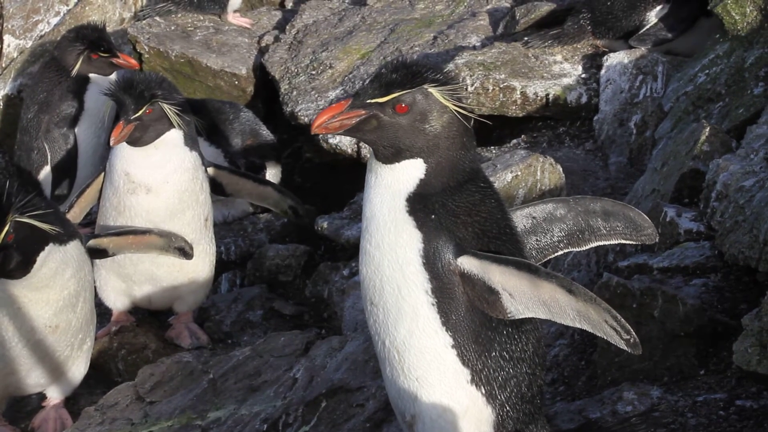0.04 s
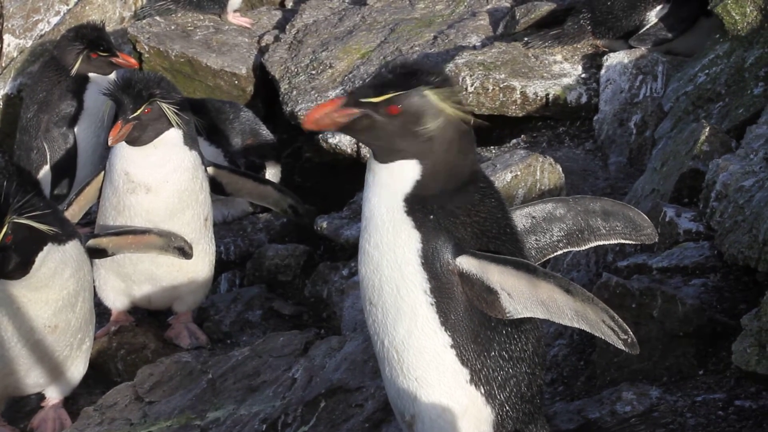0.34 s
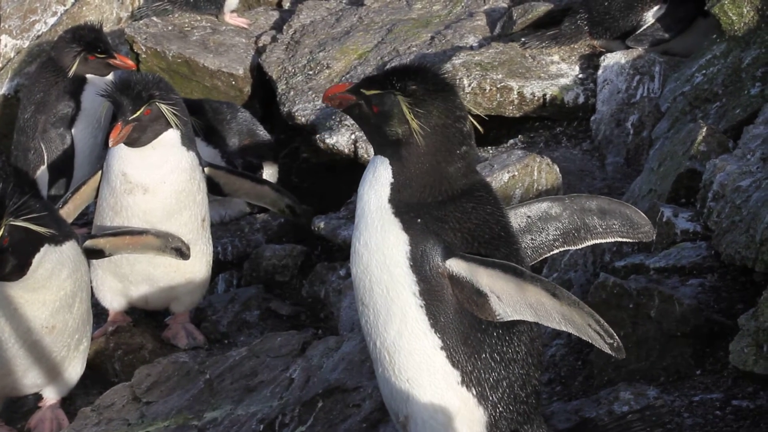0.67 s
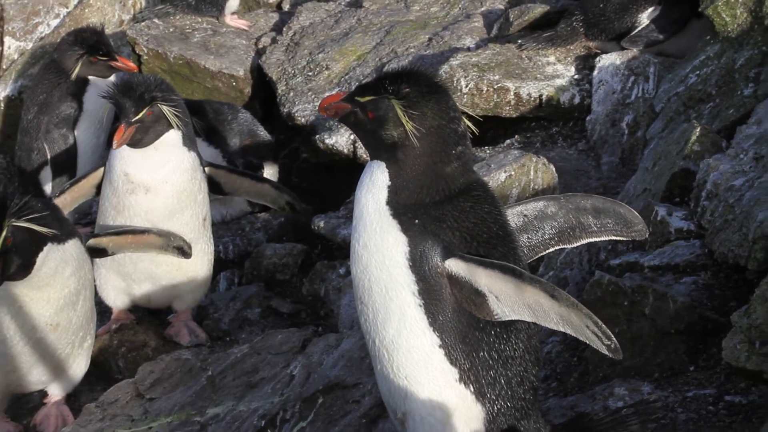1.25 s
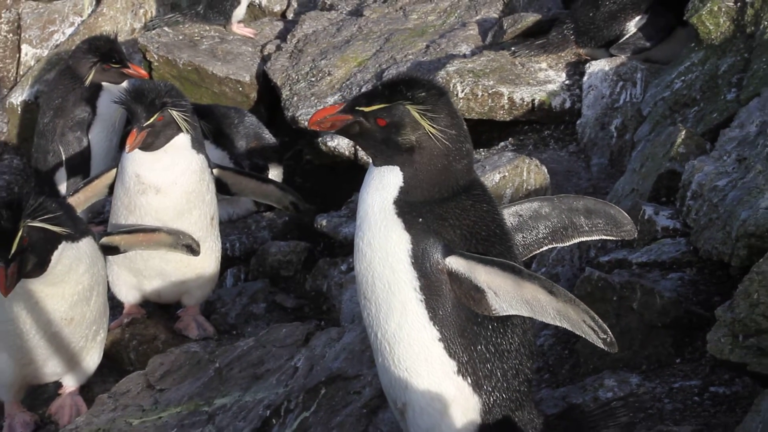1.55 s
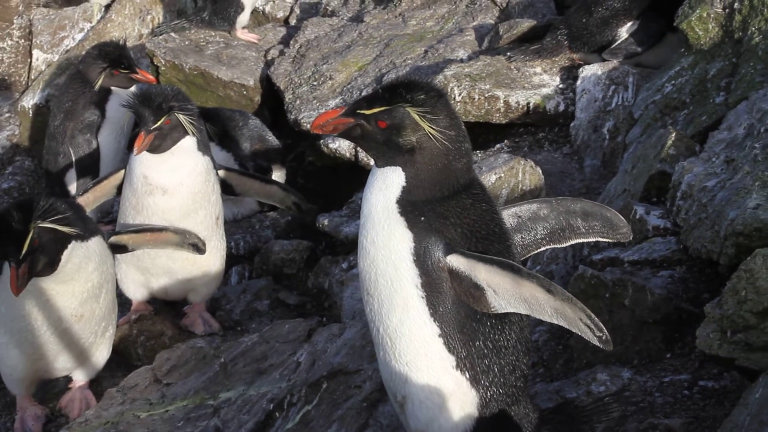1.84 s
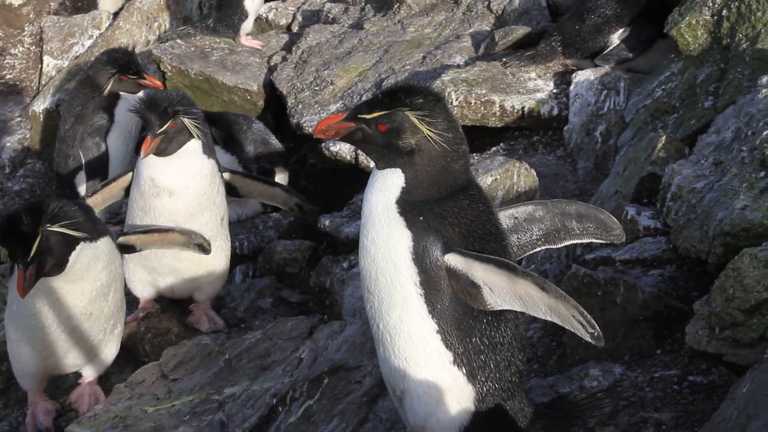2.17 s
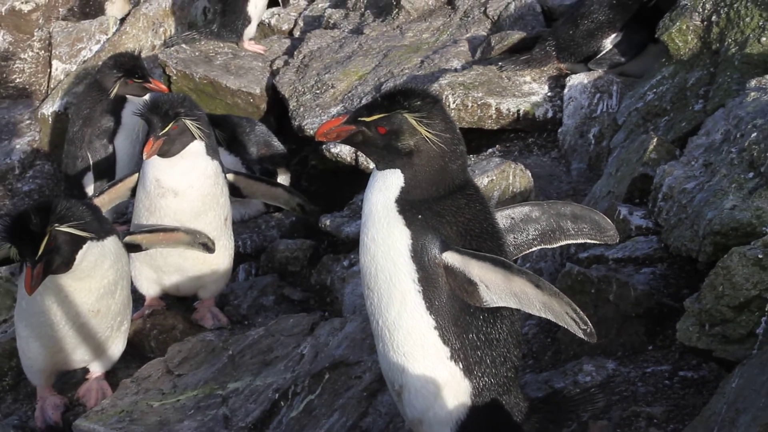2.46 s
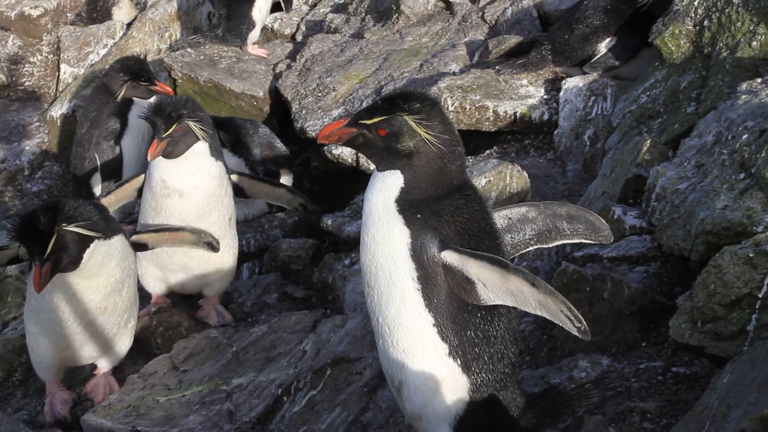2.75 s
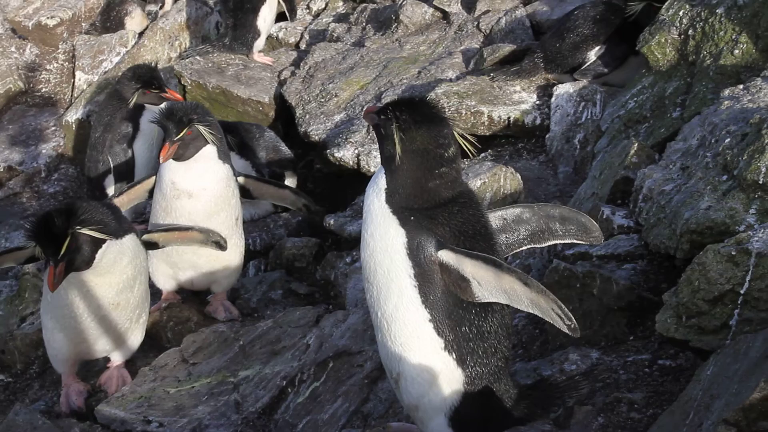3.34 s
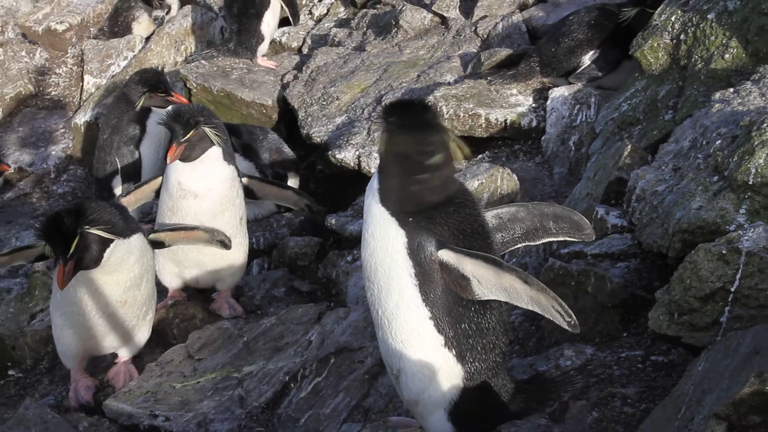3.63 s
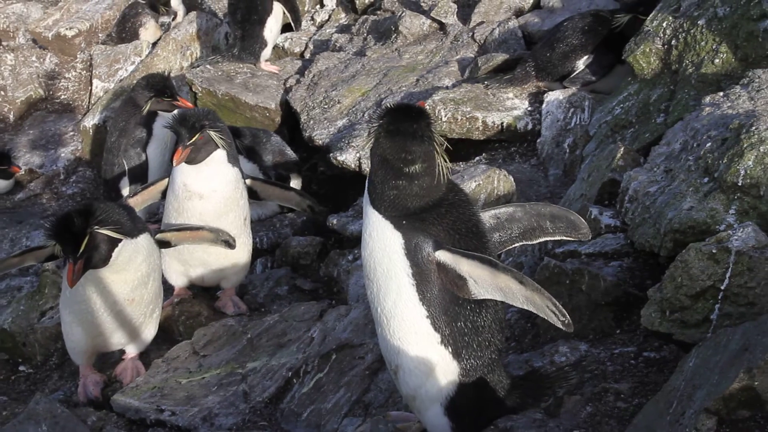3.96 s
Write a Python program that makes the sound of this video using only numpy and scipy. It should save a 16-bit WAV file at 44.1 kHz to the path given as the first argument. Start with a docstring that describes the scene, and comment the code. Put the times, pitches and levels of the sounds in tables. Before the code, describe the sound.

A penguin gives one short, mewing call over faint surf and wind.

```python
"""A penguin gives one arched, mewing call among shore rocks, close by. Its voice starts as a low creak, flips
up into a clear whistle, sinks and breaks back into the creak. Air fluttering in the throat and bill adds a
rasp, a faint breathy puff follows the call, and the rocks send back short echoes. Behind it lie faint surf and
wind, a low wavering hum, soft booms and a few scuffs on the stone."""
import sys
import numpy as np
from scipy import signal
from scipy.fft import rfft, irfft
from scipy.io import wavfile

SR = 44100
rng = np.random.default_rng(int(sys.argv[2]) if len(sys.argv) > 2 else 0)


def waveform_to_disk(signal):
    """Save audio, clipped to [-1, 1], as 16-bit WAV at the path in sys.argv[1]."""
    frames = np.transpose(np.atleast_2d(signal))
    scaled = np.clip(frames, -1, 1) * 32767
    samples = np.round(scaled).astype(np.int16)
    wavfile.write(sys.argv[1], SR, samples)


N = 176400
T = np.arange(N) / SR

# Tone color of the surf: frequency_hz, gain_db
SURF_COLOR = [(53, -37), (90, -6), (119, -2), (133, -12.5), (151, -7), (204, -14), (248, -13.5),
              (342, -10.5), (373, -14.5), (398, -13), (864, -13.5), (2710, -27), (3510, -24), (4540, -34),
              (15500, -40)]
# Loudness of the surf, in three stretches of rows: time_s, relative_db
SURF_LOUDNESS = [
    [(0.05, -70.5), (0.946, -75.5), (1.432, -71), (1.48, -71.5)],
    [(2.4, -69.5), (2.416, -70.5), (2.94, -72), (2.95, -72)],
    [(3.2, -71), (3.788, -72.5), (3.792, -70), (3.95, -71.5)],
]
# Loudness of the wind: time_s, level_db
WIND_LOUDNESS = [(0, -62), (.4, -62.5), (.55, -61), (.8, -63), (.88, -61.5), (1.02, -62.5), (1.5, -62.5),
                 (2.6, -62.5), (4, -63)]
# Low wavering tones: pitch_hz, level_db, waver_amount, waver_rate_hz
HUM_TONES = [(60.9, -64, 0.38, 2), (119.6, -73, 1.08, 7)]
# Soft low booms: middle_s, length_s, level_db, pitch_hz
BOOMS = [(.89, 0.054, -68.5, 205), (1.422, 0.054, -62, 205), (2.048, 0.051, -61, 206),
         (2.215, 0.075, -66, 226), (3.016, .07, -71.5, 225)]
# Rubs on the stone, plus one faint breathy puff from the bird just after the call (the 2.28 s row): middle_s,
# length_s, level_db, center_hz, width_octaves
RUBS_AND_PUFF = [(.3, 0.28, -77, 2570, .7), (1.637, .005, -59.5, 1200, 0.98), (1.712, 0.0047, -64, 710, 0.59),
                 (2.28, 0.06, -62, 2150, 0.39), (2.995, 0.0051, -58, 1580, 0.49),
                 (3.011, 0.02, -60.5, 1360, 0.66), (3.86, 0.082, -71.5, 1590, 0.56)]
# Tiny ticks of grit: start_s, level_db
GRIT_TICKS = [(.527, -65), (.87, -65), (3.147, -58.5), (3.285, -62)]
# Echoes off the rocks: delay_s, gain_db
ROCK_ECHOES = [(.0043, -26), (.011, -15), (.023, -36)]
# Where the throat and the bill ring: center_hz, width_hz, gain_db
THROAT_RINGS = [(1026, 104, -7), (1465, 82, -5), (1780, 70, 6.5), (2413, 220, -3), (3150, 120, -9.5),
                (3804, 220, -7), (4100, 170, -14.5)]
BILL_RINGS = [(4650, 260, -0.5), (6560, 290, 4.5), (7850, 540, -8), (10300, 1500, -16.5),
              (14000, 2000, -25)]
# Narrow bands that the bill cancels: center_hz, width_hz
BILL_NOTCHES = [(1290, 74), (2850, 67), (5050, 170)]
# Loudness of the rasp: time_s, throat_db, bill_db
RASP_LOUDNESS = [(1.53, -81, -95), (1.555, -53.5, -76), (1.62, -58, -83), (1.69, -56, -74.5),
                 (1.85, -56, -66), (1.98, -54.5, -68), (2.07, -55, -77), (2.12, -56.5, -72.5),
                 (2.144, -47, -59.5), (2.18, -50.5, -71), (2.203, -63, -81), (2.22, -85, -99)]
# The creaky voice that opens and closes the call: time_s, pitch_hz, level_db
OPENING_CREAK = [(1.529, 927.6, -70), (1.538, 968, -57), (1.549, 1009, -56), (1.559, 1072, -49),
                 (1.572, 1190, -61), (1.589, 1205, -58), (1.6, 1280, -52), (1.608, 1350, -61)]
CLOSING_CREAK = [(2.165, 1280, -63), (2.174, 1124, -46.5), (2.183, 919, -42.5), (2.192, 842, -50),
                 (2.205, 762, -57), (2.216, 700, -75)]
# Brief tones beside the whistle: middle_s, length_s, level_db, pitch_hz, glide_hz_per_s
SIDE_GLIDES = [(1.588, .016, -51, 2430, 5000), (2.12, 0.019, -50.5, 3750, -2500),
               (2.152, 0.014, -56, 2560, -3000), (2.141, 0.0089, -55.5, 6560, -9000)]
# Loudness of the undertone, which sits at half the whistle's pitch: time_s, level_db
UNDERTONE_LOUDNESS = [(1.665, -82), (1.685, -60), (1.75, -56.5), (1.8, -61), (1.9, -57), (1.965, -55),
                      (2.01, -66.5), (2.12, -71)]
# Tones that make up the undertone: multiple_of_half_pitch, gain_db
UNDERTONE_PARTS = [(1, -2.5), (3, -15.5), (5, -25.5), (7, -23)]
# Tones that make up the squeak: multiple_of_pitch, level_db
SQUEAK_PARTS = [(3, -63), (3.76, -62), (4.1, -65), (5, -69.5), (5.75, -80), (6.7, -84)]
# The whistle's arch and its harmonics (tones at 1, 2 and 3 times the pitch), before trims and notches:
# time_s, pitch_hz, first_db, second_db, third_db
WHISTLE_ARCH = [(1.606, 1687, -35, -78, -88), (1.618, 1708, -35, -51, -78), (1.634, 1737, -36, -58, -83),
                (1.642, 1795, -38, -64, -84), (1.67, 2051, -49.5, -49.5, -83),
                (1.684, 2099, -43.5, -41.5, -65.5), (1.738, 2178, -38.5, -46.5, -51),
                (1.752, 2210, -37, -45.5, -53.5), (1.86, 2186, -35.5, -42.5, -45.5),
                (1.868, 2165, -38.5, -45, -49.5), (1.912, 2175, -35.5, -43.5, -46),
                (1.962, 2109, -39.5, -41, -56), (1.972, 2098, -45, -48.5, -68),
                (2.012, 2045, -36, -43, -62.5), (2.02, 2037, -36, -46.5, -73),
                (2.072, 1953, -40.5, -55, -86), (2.122, 1713, -29.5, -52, -62),
                (2.142, 1645, -32.5, -41.5, -57.5), (2.168, 1542, -37.5, -52, -71)]
# Trims for harmonics 1 to 3: gain_db
HARMONIC_TRIMS = [-2, -2, -3.5]
# Harmonics 4 and 5, against the untrimmed third: gain_db
HIGH_HARMONICS = [-33, -36]
# Wobbles where the voice changes register: middle_s, half_length_s, swing_share_of_pitch
VOICE_BREAKS = [(1.664, 0.016, 0.061), (2.085, .012, 0.079)]


def from_db(db):
    """Turn decibels into a number to multiply by."""
    return 10 ** (np.asarray(db) / 20)


def unit_level(x):
    """Scale a sound to an average (rms) level of one."""
    return x / np.sqrt(np.mean(x ** 2) + 1e-20)


def curves(rows):
    """Join a table's points with straight lines: one curve for each column after the time."""
    times, *columns = np.transpose(rows)
    return [np.interp(T, times, column) for column in columns]


def gate(start_s, end_s, fade_s):
    """Fade in at the start, hold at one, and fade out by the end."""
    return np.clip((T - start_s) / fade_s, 0, 1) * np.clip((end_s - T) / fade_s, 0, 1)


def swell(middle_s, length_s):
    """A smooth, bell-shaped rise and fall."""
    return np.exp(-2 * ((T - middle_s) / length_s) ** 2)


def noise(gain_at):
    """Noise of level one, colored by a gain for each frequency."""
    hz = np.maximum(np.arange(N // 2 + 1) * SR / N, 1)
    return unit_level(irfft(rfft(rng.standard_normal(N)) * gain_at(hz), N))


def noise_band(center_hz, width_octaves):
    """Noise that is strongest around one frequency."""
    return noise(lambda hz: 1 / (1 + (np.log2(hz / center_hz) / width_octaves) ** 2))


def drift(rate_hz):
    """A random wander of typical size one, mostly slower than the rate."""
    return noise(lambda hz: 1 / (1 + (hz / rate_hz) ** 2))


def phase_of(hz):
    """Add up a changing pitch into the angle of a sine wave."""
    return 2 * np.pi * np.cumsum(hz) / SR


def surf(boost_db=3.5):
    """Distant waves: a deep wash of noise whose level wanders a little."""
    points_hz, gains_db = np.transpose(SURF_COLOR)
    level_db, = curves([row for stretch in SURF_LOUDNESS for row in stretch])
    wash = noise(lambda hz: from_db(np.interp(np.log(hz), np.log(points_hz), gains_db))
                 / (1 + (hz / 6000) ** 4))
    return from_db(level_db + boost_db + 0.5 * drift(5.4)) * wash


def wind():
    """Wind makes a very low rumble."""
    level_db, = curves(WIND_LOUDNESS)
    return from_db(level_db) * noise_band(center_hz=19, width_octaves=0.66)


def hum():
    """Two low tones waver in loudness and pitch."""
    sound = np.zeros(N)
    for hz, db, waver, rate_hz in HUM_TONES:
        phase = 2 * np.pi * hz * T
        tone = (1 + waver * drift(rate_hz)) * np.sin(phase)
        tone += waver * drift(rate_hz) * np.cos(phase)
        sound += from_db(db) * unit_level(tone)
    return sound


def hiss(level_db=-81.5):
    """A thin, even hiss."""
    return from_db(level_db) * rng.standard_normal(N)


def booms():
    """Brief hollow booms in the background, unsteady in pitch."""
    sound = np.zeros(N)
    for middle_s, length_s, db, hz in BOOMS:
        tone = np.sin(phase_of(hz * (1 + 0.072 * drift(30))))
        sound += from_db(db) * swell(middle_s, length_s) * unit_level(tone)
    return sound


def scuffs_and_puff(tick_decay_s=0.0013):
    """Soft grainy rubs on the stone, a faint breathy puff just after the call, and sharp ticks of grit."""
    rubs = np.zeros(N)
    for middle_s, length_s, db, center_hz, octaves in RUBS_AND_PUFF:
        grainy_level = from_db(db + 2.3 * drift(200))
        rubs += grainy_level * swell(middle_s, length_s) * noise_band(center_hz, octaves)
    tick_level = sum(from_db(db) * (T >= start_s) * np.exp(-np.abs(T - start_s) / tick_decay_s)
                     for start_s, db in GRIT_TICKS)
    return rubs + tick_level * noise(lambda hz: hz / (hz + 1200))


def rock_echoes(call, tail_db=-37.5, fade_60_db_s=0.38):
    """Nearby rocks bounce the call back as three quick echoes and a faint, short tail."""
    echoes = sum(from_db(db) * np.interp(T - delay_s, T, call, left=0) for delay_s, db in ROCK_ECHOES)
    tail = noise(lambda hz: 1 / (1 + (hz / 4500) ** 2)) * from_db(-60 * T / fade_60_db_s)
    tail /= np.sqrt(np.sum(tail ** 2))
    return echoes + from_db(tail_db) * signal.fftconvolve(call, tail)[:N]


def ring_gain(rings, hz):
    """The throat or bill favors frequencies near those at which it rings."""
    gains = [from_db(db) / (1 + ((hz - center) / width) ** 2) for center, width, db in rings]
    return np.sqrt(sum(gain ** 2 for gain in gains))


def notch_gain(hz):
    """The bill cancels a few narrow bands and lets the rest through."""
    return np.prod([1 - np.exp(-((hz - center) / width) ** 2) for center, width in BILL_NOTCHES], axis=0)


def rasp():
    """Swirling air flutters in the throat and bill, harshest as the call falls."""
    throat_db, bill_db = curves(RASP_LOUDNESS)
    throat = from_db(throat_db) * noise(lambda hz: ring_gain(THROAT_RINGS, hz) * notch_gain(hz))
    bill = from_db(bill_db) * noise(lambda hz: ring_gain(BILL_RINGS, hz) * notch_gain(hz))
    flutter = from_db(2 * drift(250))
    return (throat + bill) * flutter * gate(RASP_LOUDNESS[0][0], RASP_LOUDNESS[-1][0], fade_s=0.0059)


def creak(rows, jitter=0.022, tilt_db_per_octave=-8):
    """Uneven low pulses whose harmonics slide through the ringing bands of the throat."""
    pitch_hz, level_db = curves(rows)
    phase = phase_of(pitch_hz * (1 + jitter * drift(297)))
    gains = {k: (ring_gain(THROAT_RINGS, k * pitch_hz) + 0.068) * from_db(tilt_db_per_octave * np.log2(k))
             for k in range(1, 7)}
    voice = sum(gain * np.sin(k * phase) for k, gain in gains.items())
    voice /= np.sqrt(sum(gain ** 2 for gain in gains.values()) / 2)
    return voice * from_db(level_db + 2 * drift(220)) * gate(rows[0][0], rows[-1][0], fade_s=0.0055)


def side_tones():
    """Short rough glides sound as the two sides of the voice drift apart."""
    sound = np.zeros(N)
    for middle_s, length_s, db, hz, glide in SIDE_GLIDES:
        pitch_hz = (hz + glide * (T - middle_s)) * (1 + 0.00704 * drift(201))
        sound += from_db(db) * swell(middle_s, length_s) * unit_level(np.sin(phase_of(pitch_hz)))
    return sound


def undertone(phase):
    """A faint, unsteady voice at half the whistle's pitch."""
    level_db, = curves(UNDERTONE_LOUDNESS)
    return sum(from_db(level_db + db + 4.8 * drift(40)) * np.sin(k * phase / 2 + 0.72 * drift(34))
               for k, db in UNDERTONE_PARTS)


def squeak(pitch_hz, phase, middle_s=2.146, half_length_s=0.012, jitter=0.00906):
    """The falling voice turns harsh for a moment, with high tones that each shake in pitch."""
    tones = sum(from_db(db) * np.sin(k * (phase + phase_of(pitch_hz * jitter * drift(300))))
                for k, db in SQUEAK_PARTS)
    return tones * np.exp(-((T - middle_s) / half_length_s) ** 2)


def whistle(wobble_hz=115, jitter=0.0022, shimmer_db=0.5, trill_hz=303, trill_depth=0.064):
    """The clear arched tone, wobbling where the voice breaks, with its undertone and squeak."""
    pitch_hz, *arch_db = curves(WHISTLE_ARCH)
    swing = sum(share * np.exp(-((T - middle_s) / half_s) ** 2)
                for middle_s, half_s, share in VOICE_BREAKS)
    wobble = swing * np.sin(phase_of(wobble_hz * (1 + 0.1585 * drift(40))))
    phase = phase_of(pitch_hz * (1 + jitter * drift(150) + wobble))
    harmonics_db = [db + trim for db, trim in zip(arch_db, HARMONIC_TRIMS)]
    harmonics_db += [arch_db[2] + db for db in HIGH_HARMONICS]
    tone = sum(from_db(db + shimmer_db * drift(50)) * notch_gain(k * pitch_hz) * np.sin(k * phase)
               for k, db in enumerate(harmonics_db, start=1))
    # The trill is a fast, uneven beating of the loudness.
    trill = 1 + trill_depth * np.sin(phase_of(trill_hz * (1 + 0.3 * drift(80))))
    voice = tone * trill + undertone(phase) + squeak(pitch_hz, phase)
    return np.sqrt(2) * voice * gate(start_s=1.604, end_s=2.175, fade_s=0.007)


def scene():
    """Mix the penguin's call, its echoes and the shore into one channel."""
    call = whistle() + side_tones() + creak(OPENING_CREAK) + creak(CLOSING_CREAK) + rasp()
    shore = surf() + wind() + hum() + hiss() + booms() + scuffs_and_puff()
    return (call + rock_echoes(call) + shore)[None]


def record(dry):
    """Cut the highest treble and shift the whole wave by a small, steady offset."""
    cutoff_hz, offset = 15750, 0.0251
    treble_cut = signal.ellip(10, 0.05, 60, cutoff_hz, fs=SR, output="sos")
    return signal.sosfiltfilt(treble_cut, dry) + offset


dry = scene()
out = record(dry)
waveform_to_disk(out)
```